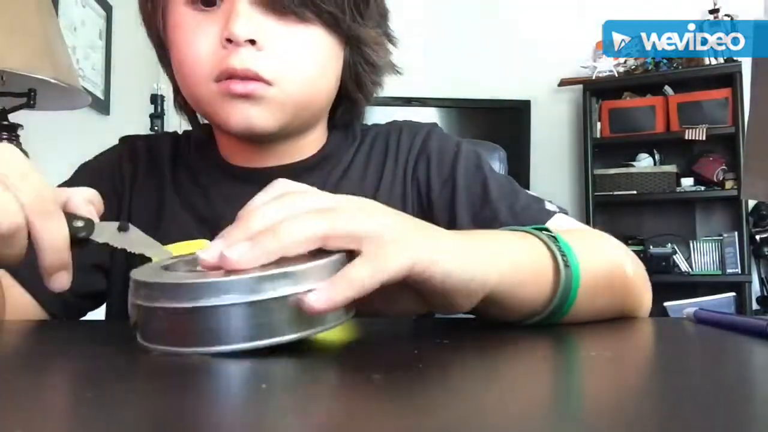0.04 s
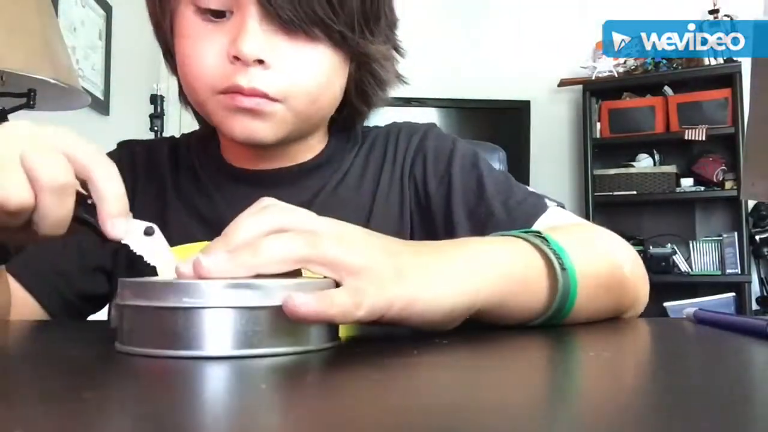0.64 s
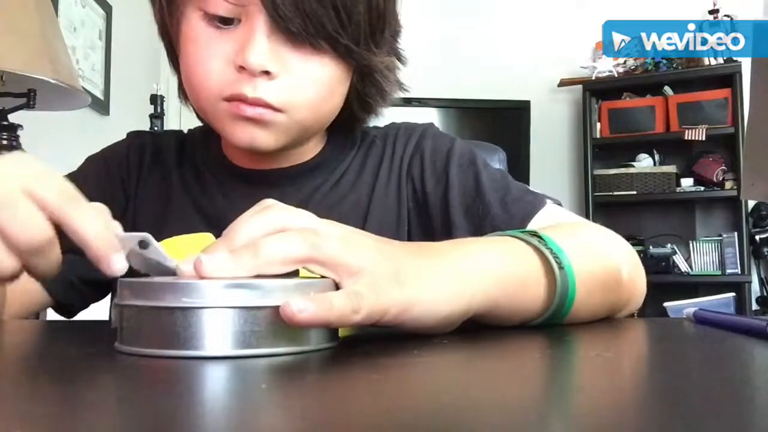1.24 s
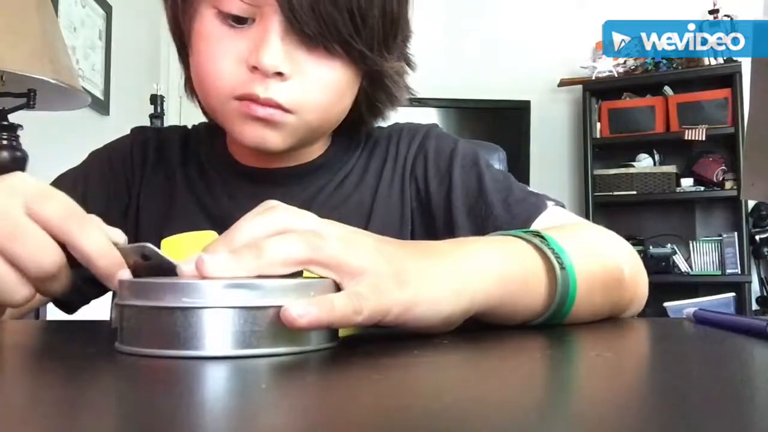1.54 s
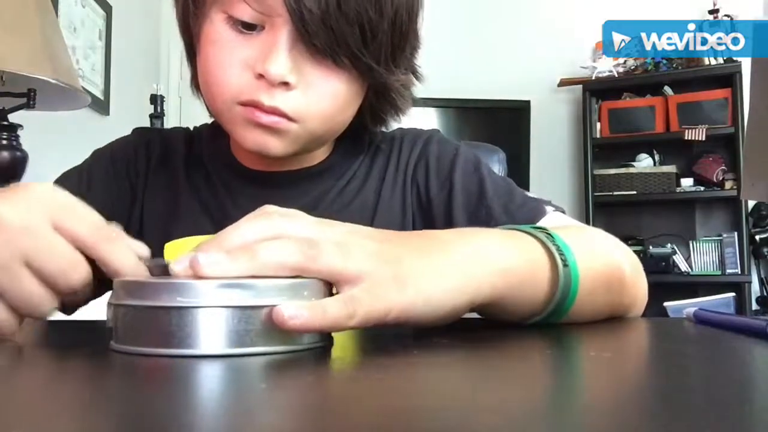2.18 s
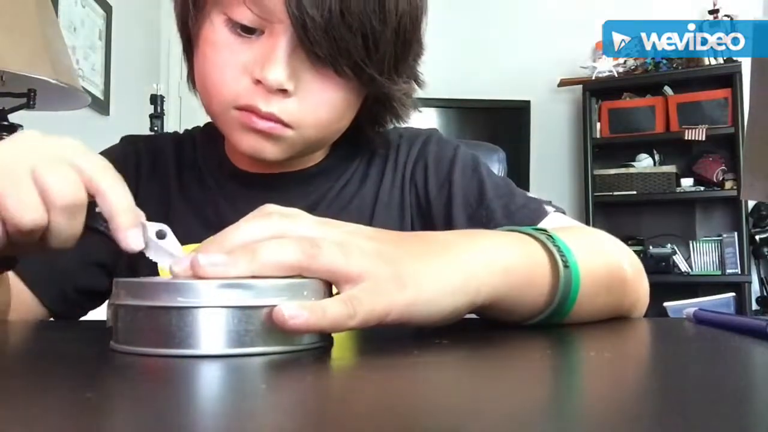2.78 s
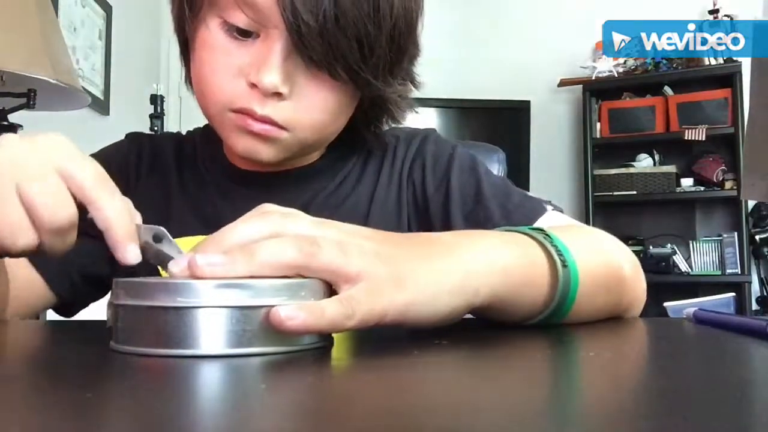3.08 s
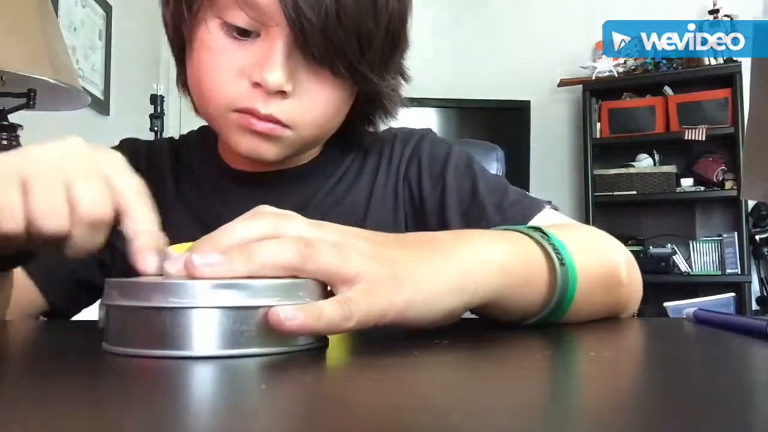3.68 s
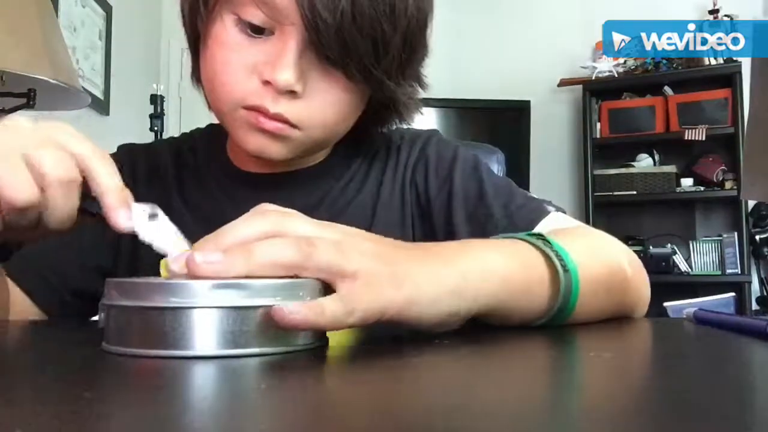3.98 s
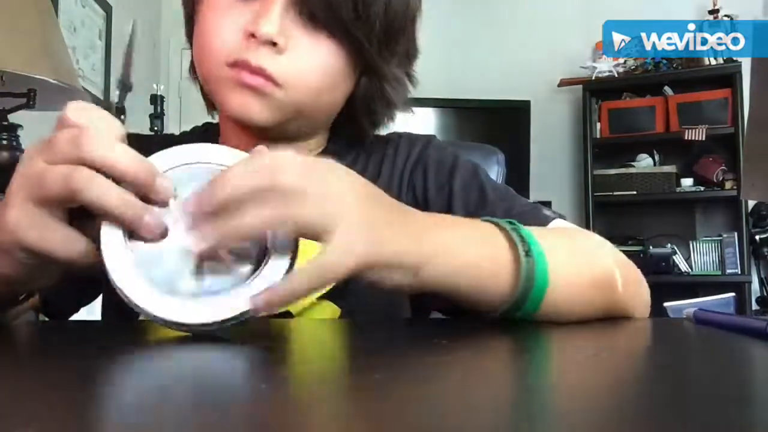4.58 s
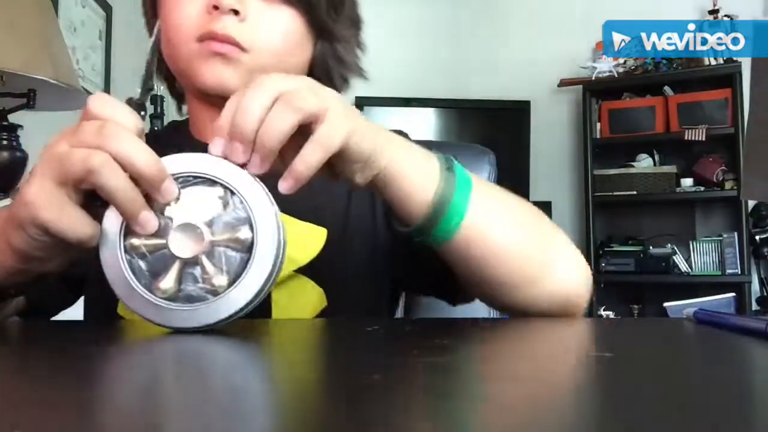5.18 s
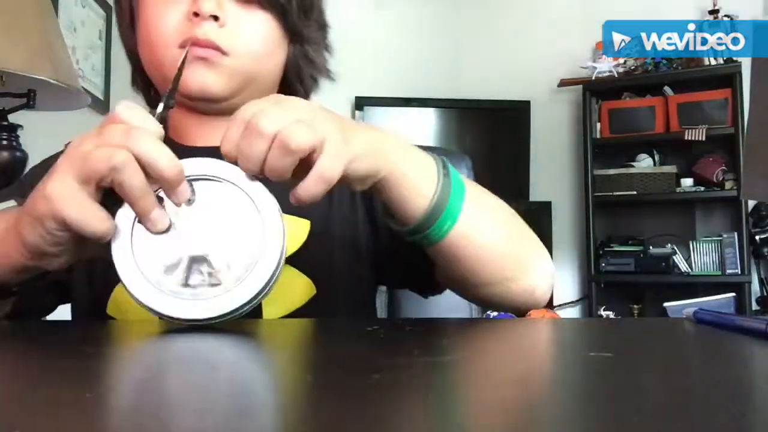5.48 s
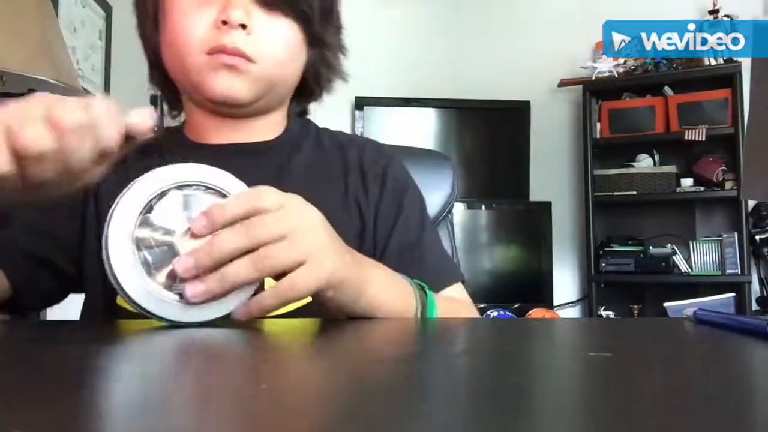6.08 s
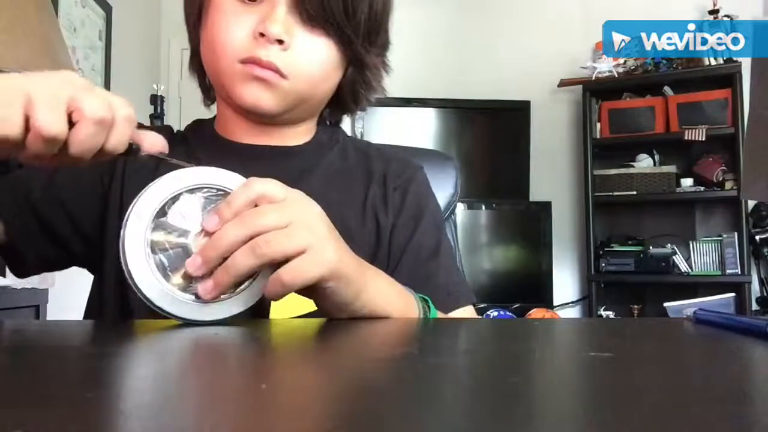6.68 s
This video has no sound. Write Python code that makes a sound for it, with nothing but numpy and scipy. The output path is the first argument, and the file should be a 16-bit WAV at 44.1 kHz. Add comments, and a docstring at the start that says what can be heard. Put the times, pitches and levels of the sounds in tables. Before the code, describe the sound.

A serrated knife gives a short scrape on the rim of a metal tin, then slips at about 0.3 seconds with a very loud, slightly clipped clack, a thud and a brief hum from the lid. Faint, irregular scrapes follow from 0.9 to 1.7 seconds. A quick cluster of sharp clicks comes at 2 seconds, and more soft rasping around 2.7. After a lull, the blade catches and snaps loudly near 3.7 seconds. From 4.2 to 4.7 the tin is dragged across a table with a hollow grind that rises in pitch, ending in two knocks. It rolls quietly on its edge from about 5 seconds, with dull knocks at 5.2, 5.8 and around 6.1. The blade clicks lightly at 6.3 and ticks faintly at 6.8. Everything sounds close, in a small room with a short echo and faint steady hiss.

```python
"""Knife prying at a tin

A serrated knife scrapes the rim of a round metal tin on a table, catching and slipping with sharp clicks.
The tin is then dragged, tipped on its edge and rolled, and the blade ticks on the rim again. Tiny slips
and short impacts excite the tin's resonances. The room is small; the hardest slips clip the microphone."""
import sys
import numpy as np
from scipy import signal
from scipy.fft import rfft, irfft, next_fast_len
from scipy.io import wavfile
from scipy.ndimage import map_coordinates

SR = 44100
rng = np.random.default_rng(int(sys.argv[2]) if len(sys.argv) > 2 else 0)


def wrap_up_sound(samples):
    """Save the sound to the file named by the first command line argument, as 16-bit audio."""
    columns = np.atleast_2d(samples).T
    # keep every value between -1 and 1, then stretch to whole-number steps
    tamed = np.clip(columns, -1, 1)
    steps = np.round(tamed * 32767).astype(np.int16)
    wavfile.write(sys.argv[1], SR, steps)


N = 305613

# Event levels are before each voice's trim; *_rel_db is relative to the row's level_db.
# blade strokes on the rim: peak_s, rise_s, hold_s, level_db, hollow_rel_db, rasp_rel_db
BLADE_STROKES = [(0.143, 0.046, 0.054, -44, -10.5, -15), (.242, 0.03, 0.012, -23, -3.5, -13.5),
                 (0.863, 0.012, 0.0061, -42, -20, -22), (1.04, 0.039, .03, -55.5, -15, -17),
                 (1.144, .06, 0.0085, -48, -4, -18), (1.254, .025, 0.076, -57, -1, -16),
                 (1.377, 0.052, 0.034, -45, -9.5, -12.5), (1.724, 0.072, 0.0059, -53.5, -7, -23.5),
                 (2.0, 0.061, 0.0085, -47, -9, -22.5), (2.022, .008, .014, -31.5, 0, -5.5),
                 (2.18, 0.062, 0.041, -48, -10, -11), (2.626, 0.031, 0.032, -44.5, -1.5, -23),
                 (2.672, 0.051, 0.013, -31.5, -3, -16), (2.773, .012, 0.033, -55.5, 10.5, -28),
                 (2.87, .006, 0.0056, -48, 9, -28), (2.892, 0.0055, 0.019, -48, 3.5, -34),
                 (2.955, 0.045, .006, -59.5, 9.5, -23.5), (3.341, 0.034, 0.0028, -56, -1, -31),
                 (3.775, 0.0717, 0.0051, -41.5, -5.5, -4)]
# blade catches and slips: start_s, level_db, edge_rel_db, tick_rel_db, ping_hz
BLADE_CLICKS = [(.259, 6.5, -3.5, -12, 3500), (1.002, -47.5, 11.5, 2.5, 4460), (2.017, -34, 11, 5, 4600),
                (2.021, -33, 12.5, -30, 4340), (2.047, -25.5, 2, -17, 1540), (2.075, -14.5, -6, -36, 1980),
                (2.527, -42, -0.5, -7, 4110), (3.209, -49, 3, 4, 4196), (3.612, -30.5, -10, -25.5, 2380),
                (3.634, -13, -19.5, -23.5, 6070), (3.664, 0.5, -8.5, -22, 3055),
                (3.779, -24.5, -18, -23, 3060), (4.135, -39.5, -1, -28, 2010),
                (4.235, -35, -1.5, -34.5, 3870), (6.239, -44.5, 5.5, 0, 2070),
                (6.269, -30.5, 4.5, -3, 1855), (6.821, -44.5, 1, -13, 2400), (6.833, -45.5, -3, 7.5, 6000),
                (6.843, -40.5, 0, 6, 8800)]
# duller knocks on the body: start_s, level_db, thump_rel_db
BODY_KNOCKS = [(.282, -6, -3.5), (0.861, -39.5, 2), (2.028, -17, -13), (4.097, -27, -16), (4.623, -20, -3),
               (4.702, -14, -4.5), (5.106, -34, -0.5), (5.19, -25, -4), (5.794, -21.5, -0.5),
               (5.971, -30, 8.5), (6.042, -29.5, 5), (6.06, -27, 1), (6.124, -26.5, 3.5)]
# tin moving on the table: peak_s, rise_s, hold_s, fall_s, level_db, hollow_rel_db, rumble_rel_db
FLAT_DRAGS = [(0.0, .01, 0.017, .15, -50.5, 4.5, -12.5), (4.225, 0.046, .012, 0.013, -44, 5, 8),
              (4.28, 0.023, 0.029, 0.055, -31.5, -12, -22), (4.342, 0.069, 0.033, 0.077, -17.5, -2, -43),
              (4.45, 0.15, 0.066, 0.045, -30, 5, -13), (4.627, 0.038, .01, 0.064, -28, 7.5, -7),
              (4.68, 0.05, 0.014, 0.038, -29, 0, -9)]
EDGE_ROLLS = [(4.715, .02, .005, 0.1, -54.5, 27, 17), (4.87, 0.072, 0.027, 0.076, -55, -1, 13),
              (5.2, 0.018, 0.081, .13, -46, 0.5, 6.5), (5.41, 0.15, 0.047, 0.065, -50.5, 3, 8.5),
              (5.74, 0.036, 0.036, .05, -41.5, -0.5, 9), (5.793, 0.055, 0.0022, 0.029, -33.5, 16, -4),
              (5.812, 0.023, 0.0053, 0.13, -60, 32.5, 27.5), (5.975, 0.026, 0.021, 0.041, -36.5, 8.5, 6.5),
              (6.05, 0.062, 0.0063, 0.039, -30.5, 4, -0.5), (6.125, 0.13, 0.0087, 0.083, -63, 31, 19),
              (6.27, 0.056, 0.0043, 0.085, -45, 4, 0), (6.5, .04, 0.024, .06, -66.5, 13.5, -2.5),
              (6.595, 0.036, 0.0052, 0.046, -54, 6, 14.5), (6.7, 0.047, 0.021, 0.033, -68.5, 13, 7.5)]
# cavity under the tin as one side lifts: time_s, pitch_hz
GAP_GLIDE = [(4.3, 480), (4.34, 615), (4.365, 940), (4.39, 1090), (4.42, 1040)]
# table-top reflection as the tin tilts: time_s, delay_s
BOUNCE_DELAYS = [(4.22, 0.00074), (4.32, 0.00058), (4.44, 0.00064), (4.65, 0.00058), (6.3, 0.00056)]
# tin landing on the table: start_s, level_db
TIN_LANDINGS = [(0.26, -16), (2.03, -41), (4.077, -41), (4.704, -22.5), (5.799, -22), (5.97, -41),
                (6.066, -25.5), (6.595, -40.5)]
# undamped lid notes: start_s, level_db
LID_RINGS = [(0.0, -44.5), (.263, -25)]
# faint whine: peak_s, rise_s, hold_s, fall_s
WHINE_SWELLS = [(5.05, 0.14, 0.48, 0.16), (6.53, 0.1, 0.34, 0.1)]

# tin resonances: centre_hz, width_hz, gain_db
TIN_MODES = [(398, 65, -1.5), (510, 37, -6), (567.6, 44, -2.5), (754, 76, -7.5), (802, 130, -1.5),
             (1113, 80, -5), (1240, 380, -4), (1510, 70, -2.5), (1657, 160, -1.5), (1890, 180, -4),
             (2257, 190, -4.5), (2570, 45, -4.5), (3390, 240, -5), (4374, 420, -1.5), (5700, 2700, -3.5),
             (7400, 610, -9), (8800, 1200, -7.5)]
# friction spectra: freq_hz, gain_db
BLADE_SCRAPE = [(350, -29.5), (560, -4.5), (800, 2.5), (1050, -1), (1250, -9.5), (1650, -11.5),
                (2350, -11.5), (2900, -28.5), (4500, -47.5)]
BLADE_HOLLOW = [(150, -27), (280, -11), (390, 12), (520, 0), (640, -4.5), (900, -30)]
METAL_RASP = [(1500, -31.5), (2700, 0), (3400, 3.5), (4200, 2.5), (4700, -7), (5700, -5), (7200, -11),
              (8200, -16), (10000, -20), (15500, -30)]
TABLE_RUMBLE = [(25, -32.5), (50, -44), (85, -4.5), (130, 3.5), (190, 5.5), (270, 2.5), (350, -17.5),
                (600, -62)]
FLAT_HOLLOW = [(270, -29.5), (320, -17), (380, 7), (500, -1), (600, -3.5), (700, -10), (950, -37)]
FLAT_GRIND = [(450, -40), (620, -6.5), (800, 5), (1120, 1.5), (1250, -2), (2000, -7), (2500, -9),
              (4000, -38.5)]
TIPPED_HOLLOW = [(200, -21), (320, 0.5), (390, 0.5), (520, -3), (620, -15), (850, -35)]
TIPPED_GRIND = [(500, 1.5), (680, -15), (850, 5.5), (1300, -4), (1800, -5), (2350, -3), (2800, -7),
                (3600, -20.5)]
# impact spectra: freq_hz, gain_db
TIN_CLACK = [(150, -25.5), (380, -8.5), (700, 2), (1300, 0), (1900, 0), (2500, -7), (3200, -9.5),
             (4500, -25.5), (8000, -49.5)]
BODY_THUMP = [(40, -27), (90, -7.5), (160, -5.5), (250, -3.5), (390, 1), (550, -9), (1200, -35)]
STEEL_EDGE = [(1200, -21), (2100, -4.5), (3200, 0), (4300, 1), (4900, -6.5), (6000, -0.5), (7500, -10),
              (11000, -25.5)]
STEEL_TICK = [(4000, -23), (7500, -2.5), (8800, 4.5), (10200, -5.5), (12000, -0.5), (15500, -7)]
TABLE_THUD = [(25, -21.5), (55, -15), (85, 2.5), (125, -8.5), (190, -5.5), (300, -12), (600, -41.5)]
# wall reflection and background spectra: freq_hz, gain_db
WALL_RETURN = [(100, -5.5), (500, 2), (2000, -8), (4000, -5), (6500, -2.5), (9000, -4), (14000, -7.5)]
ROOM_HISS = [(15, -37), (25, -6.5), (242, -3), (344, -9.5), (427, -5.5), (463, -21.5), (575, -12.5),
             (887, -12), (1040, -14.5), (1480, -18.5), (1610, -23), (1740, -19.5), (2050, -20), (6560, -25),
             (16000, -35)]
WHINE_BAND = [(1900, -22), (2400, 1), (2600, 0), (3100, -23)]
# room decay: freq_hz, t60_s
ROOM_DECAY = [(80, 0.43), (400, 0.32), (1500, 0.36), (6000, 0.3), (13000, 0.14)]

CONTACT_DELAY_S = 0.0008  # short delay before each click, knock and ping sounds
GRID_S = 0.001  # envelope step


def knife(fall_s=0.039):
    """Teeth grate on the rim: the tin rings low and mid, the table rumbles, the steel rasps above."""
    peak_s, rise_s, hold_s, level_db, hollow_rel_db, rasp_rel_db = np.transpose(BLADE_STROKES)
    voices = [(BLADE_HOLLOW, 4, level_db + hollow_rel_db - 1),
              (BLADE_SCRAPE, 6, level_db - 1),
              (METAL_RASP, 1.3, level_db + rasp_rel_db - 1),
              (TABLE_RUMBLE, 0, level_db + hollow_rel_db - 14)]
    power = swells(peak_s, rise_s, hold_s, np.full(len(peak_s), fall_s))
    return friction(power, voices, slips_per_s=2800, spread_db=5, flutter_db=1.5)


def contacts(hard_edge_db=-12, dull_above_hz=900):
    """Each click or knock clacks the tin, thumps its body and snaps off the steel. Rows: direct, room."""
    out = np.zeros((2, N))
    # clicks hardly move the body; knocks carry little steel
    clicks = [(start_s, db, -12.5, edge, tick) for start_s, db, edge, tick, _ in BLADE_CLICKS]
    knocks = [(start_s, db, thump, -24, -42.5) for start_s, db, thump in BODY_KNOCKS]
    for start_s, level_db, thump_rel_db, edge_rel_db, tick_rel_db in clicks + knocks:
        # less edge, softer contact: a duller, longer clack
        soft_db = max(0, hard_edge_db - edge_rel_db)
        dulled = [(hz, db - 0.25 * soft_db * max(0, np.log2(hz / dull_above_hz))) for hz, db in TIN_CLACK]
        clack = amp(1) * impact(dulled, t60_s=0.024 * (1 + 0.013 * soft_db), ring=0.81, snap=0.57)
        thump = amp(thump_rel_db - 1) * impact(BODY_THUMP, t60_s=0.076, ring=5, snap=0.65)
        edge = amp(edge_rel_db - 1) * impact(STEEL_EDGE, t60_s=0.0081, ring=1.9, snap=0.2)
        tick = amp(tick_rel_db + 1) * impact(STEEL_TICK, t60_s=0.014, ring=1, snap=0.076)
        add(out, start_s + CONTACT_DELAY_S, amp(level_db) * (clack + thump + edge + tick))
    return out


def blade_pings(trim_db=-3.5, t60_s=0.017):
    """The blade rings after each click, at a pitch set by where it is caught."""
    out, t = np.zeros(N), np.arange(SR // 10) / SR
    for start_s, level_db, edge_rel_db, _, ping_hz in BLADE_CLICKS:
        phase = 2 * np.pi * ping_hz * t + 0.7 * wobble(len(t), rate_hz=600)
        decay = amp(level_db + edge_rel_db + trim_db - 60 * t / t60_s)
        attack = 1 - np.exp(-t * ping_hz)
        add(out, start_s + CONTACT_DELAY_S, attack * decay * np.sin(phase))
    return out


def handling(bounce_gain=0.45, bounce_above_hz=2000):
    """The tin is dragged, then rolled; treble bouncing off the table forms a comb that sweeps with tilt."""
    drag = slide(FLAT_DRAGS, FLAT_HOLLOW, FLAT_GRIND, rumble_db=-1.5, hollow_db=-4, grind_db=-0.5,
                 rasp_db=-14, bite=0, ring=2.9, slips_per_s=6000, flutter_db=1.3)
    roll = slide(EDGE_ROLLS, TIPPED_HOLLOW, TIPPED_GRIND, rumble_db=1.5, hollow_db=-4.5, grind_db=-3,
                 rasp_db=-13, bite=0.45, ring=6.1, slips_per_s=2200, flutter_db=1.5)
    direct = gap_resonance(drag) + roll
    highpass = signal.butter(2, bounce_above_hz, "high", fs=SR, output="sos")
    treble = signal.sosfiltfilt(highpass, direct)
    t = np.arange(N) / SR
    delay_s = np.interp(t, *np.transpose(BOUNCE_DELAYS))
    return direct + bounce_gain * np.interp(t - delay_s, t, treble)


def slide(moves, hollow, grind, rumble_db, hollow_db, grind_db, rasp_db, bite, ring, slips_per_s,
          flutter_db, bite_from_db=-36.5):
    """The rim grinds, the table rumbles, the hollow tin rings; bite adds rasp as the grind gets louder."""
    peak_s, rise_s, hold_s, fall_s, level_db, hollow_rel_db, rumble_rel_db = np.transpose(moves)
    voices = [(TABLE_RUMBLE, 0, level_db + rumble_rel_db + rumble_db),
              (hollow, ring, level_db + hollow_rel_db + hollow_db),
              (grind, ring, level_db + grind_db),
              (METAL_RASP, 1, level_db + rasp_db + bite * (level_db - bite_from_db))]
    power = swells(peak_s, rise_s, hold_s, fall_s)
    return friction(power, voices, slips_per_s, spread_db=4.5, flutter_db=flutter_db)


def gap_resonance(drag, width_hz=200, gain=0.72, duck=0.14, fade_s=0.025):
    """The opening gap under the tin resonates with the drag and glides upwards."""
    t = np.arange(N) / SR
    time_s, pitch_hz = np.transpose(GAP_GLIDE)
    carrier = np.exp(2j * np.pi * np.cumsum(np.interp(t, time_s, pitch_hz)) / SR)
    pole = np.exp(-np.pi * width_hz / SR)
    resonance = 2 * np.real(carrier * signal.lfilter([1 - pole], [1, -pole], drag / carrier))
    opening = np.clip(1 + np.minimum(t - time_s[0], time_s[-1] - t) / fade_s, 0, 1)
    return drag + opening * (gain * resonance - duck * drag)


def landings():
    """The table thuds under the tin's weight. Rows: direct, room."""
    out = np.zeros((2, N))
    for start_s, level_db in TIN_LANDINGS:
        add(out, start_s, amp(level_db) * impact(TABLE_THUD, t60_s=0.057, ring=0, snap=0.83))
    return out


def lid_ring(pitch_hz=439.4, t60_s=0.44, waver_rad=0.88):
    """The undamped lid hums on with a wavering note."""
    out, t = np.zeros(N), np.arange(SR // 2) / SR
    for start_s, level_db in LID_RINGS:
        note = unit_rms(np.sin(2 * np.pi * pitch_hz * t + waver_rad * wobble(len(t), rate_hz=60)))
        attack = 1 - np.exp(-t * pitch_hz)
        add(out, start_s, note * attack * amp(level_db - 60 * t / t60_s))
    return out


def room(x, onset_s=0.0027):
    """The walls answer a moment later; the treble is weaker and dies first."""
    hz, t, noise = signal.stft(rng.standard_normal(SR // 2), SR, nperseg=256)
    fade_db = log_interp(WALL_RETURN, hz)[:, None] - 60 * t / log_interp(ROOM_DECAY, hz)[:, None]
    tail = signal.istft(noise * amp(fade_db), SR, nperseg=256)[1]
    tail *= 1 - np.exp(-(np.arange(len(tail)) / SR / onset_s) ** 2)
    return signal.fftconvolve(x, tail / np.linalg.norm(tail))[:N]


def hiss(level_db=-67):
    """Faint steady room noise."""
    return amp(level_db) * unit_rms(colour(rng.standard_normal(N), ROOM_HISS))


def whine(level_db=-74):
    """A thin band of noise comes and goes behind the handling."""
    power = swells(*np.transpose(WHINE_SWELLS)).sum(axis=0)
    return amp(level_db) * envelope(power) * unit_rms(colour(rng.standard_normal(N), WHINE_BAND))


def friction(power, voices, slips_per_s, spread_db, flutter_db):
    """Tiny uneven slips, bunched as the contact grabs, excite each voice: (spectrum, ring, dB per rub)."""
    slips = (rng.random(N) < slips_per_s / SR) * rng.choice([-1, 1], N)
    size_db = spread_db * rng.uniform(-0.2, 1, N) + flutter_db * wobble(N, rate_hz=190)
    slips = slips * amp(size_db)
    return sum(envelope(amp(db) ** 2 @ power) * unit_rms(colour(slips, spectrum, ring))
               for spectrum, ring, db in voices)


def impact(spectrum, t60_s, ring, snap):
    """An impulse of size snap plus a quickly damped rattle. Rows: direct (peak 1), room."""
    t = np.arange(SR // 6) / SR
    impulse = 1.0 * (t == 0)
    rattle = rng.standard_normal(len(t)) * amp(-60 * t / t60_s)
    direct = colour(rattle / np.linalg.norm(rattle) + snap * impulse, spectrum, ring)
    # summed over all directions: same energy, smoother spectrum
    diffuse = colour(impulse, spectrum, ring)
    diffuse *= np.linalg.norm(direct) / np.linalg.norm(diffuse)
    return np.array([direct, diffuse]) / np.abs(direct).max()


def colour(x, spectrum, ring=0):
    """Minimum-phase filter with the given spectrum; ring brings out the tin's resonances."""
    size = 2 * next_fast_len(len(x) // 2 + 2048)
    hz = np.fft.rfftfreq(size, 1 / SR)
    modes = sum(amp(db) ** 2 / (1 + (2 * (hz - centre_hz) / width_hz) ** 2)
                for centre_hz, width_hz, db in TIN_MODES)
    low_cut = np.minimum(1, hz / spectrum[0][0] + 0.01)
    high_cut = np.minimum(1, spectrum[-1][0] / (hz + 1)) ** 2
    gain = low_cut * high_cut * amp(log_interp(spectrum, hz)) * np.sqrt(1 + ring ** 2 * modes)
    cepstrum = irfft(np.log(gain))
    cepstrum[1:size // 2] *= 2
    cepstrum[size // 2 + 1:] = 0
    return irfft(rfft(x, size) * np.exp(rfft(cepstrum)))[:len(x)]


def swells(peak_s, rise_s, hold_s, fall_s, swell_db=23):
    """Power on the grid, a row per rub: gains swell_db over the rise, holds, loses it over the fall."""
    t = np.arange(0, N / SR, GRID_S)
    distance = np.array([np.maximum((peak - t) / rise, (t - peak - hold) / fall)
                         for peak, rise, hold, fall in zip(peak_s, rise_s, hold_s, fall_s)])
    return amp(-swell_db * np.clip(distance, 0, 10)) ** 2


def envelope(power):
    """Grid power to gain per sample."""
    return np.interp(np.arange(N) / SR, np.arange(len(power)) * GRID_S, np.sqrt(power))


def wobble(size, rate_hz):
    """Smooth random curve with knots at rate_hz."""
    knots = rng.standard_normal(int(size * rate_hz / SR) + 4)
    return map_coordinates(knots, [np.arange(size) * rate_hz / SR])


def log_interp(points, hz):
    """Read (freq_hz, value) points on a log axis."""
    freq_hz, values = np.transpose(points)
    return np.interp(np.log(hz + 1), np.log(freq_hz), values)


def add(track, start_s, sound):
    """Mix a sound into a track."""
    part = track[..., max(0, round(start_s * SR)):][..., :sound.shape[-1]]
    part += sound[..., :part.shape[-1]]


def amp(db):
    """Decibels to gain."""
    return 10 ** (np.asarray(db) / 20)


def unit_rms(x):
    """Scale to rms 1."""
    return x / np.sqrt(np.mean(x ** 2) + 1e-20)


def scene(impact_send_db=-14, rub_send_db=-19):
    """Impacts and friction in the room, over a faint hiss."""
    impacts, diffuse = contacts() + landings()
    rubs = knife() + handling()
    background = hiss() + whine()
    ringing = blade_pings() + lid_ring()
    reverb = room(amp(impact_send_db) * diffuse + amp(rub_send_db) * rubs)
    return (impacts + ringing + rubs + reverb + background)[None]


def record(dry, cutoff_hz=16100):
    """Clip at full scale, then low-pass steeply."""
    size = next_fast_len(N + SR // 2)
    hz = np.fft.rfftfreq(size, 1 / SR)
    lowpass = 1 / np.sqrt(1 + (hz / cutoff_hz) ** 90)
    return irfft(rfft(np.clip(dry, -1, 1), size) * lowpass, size)[..., :N]


dry = scene()
out = record(dry)
wrap_up_sound(out)
```